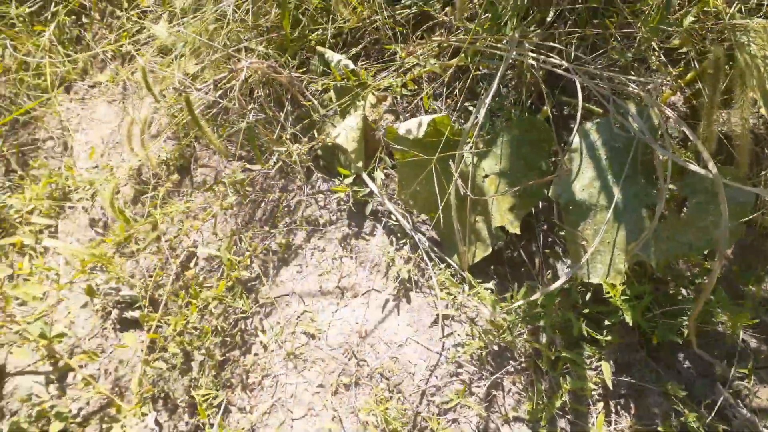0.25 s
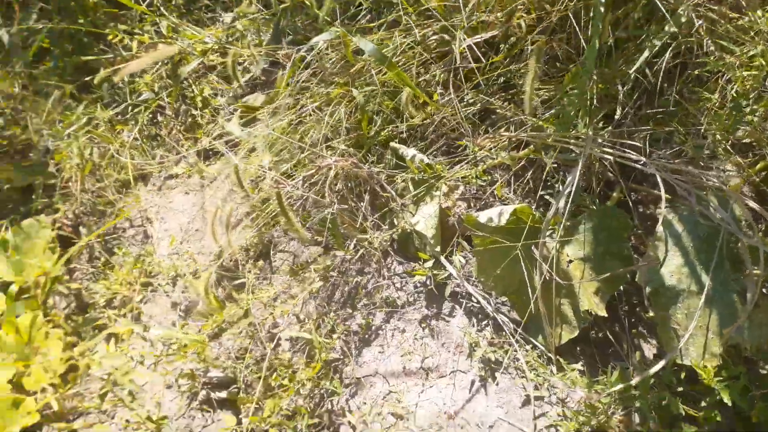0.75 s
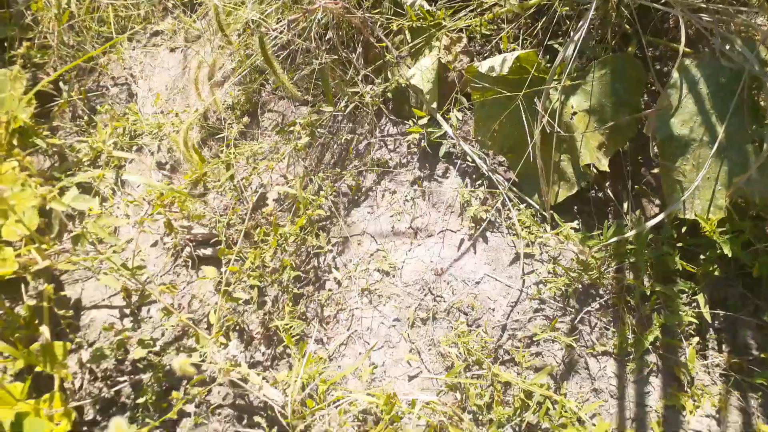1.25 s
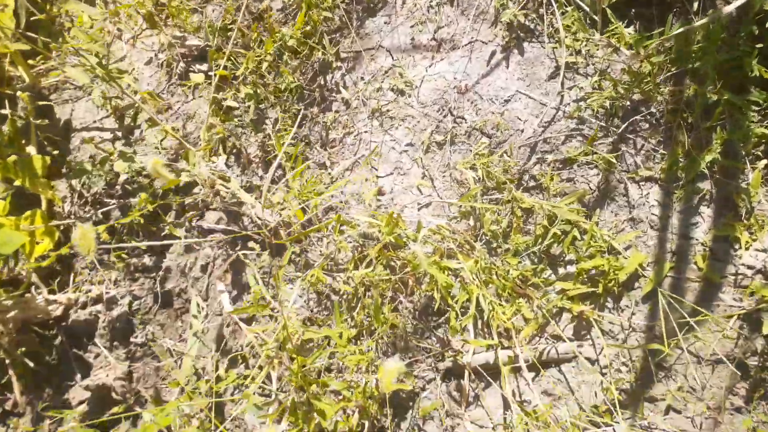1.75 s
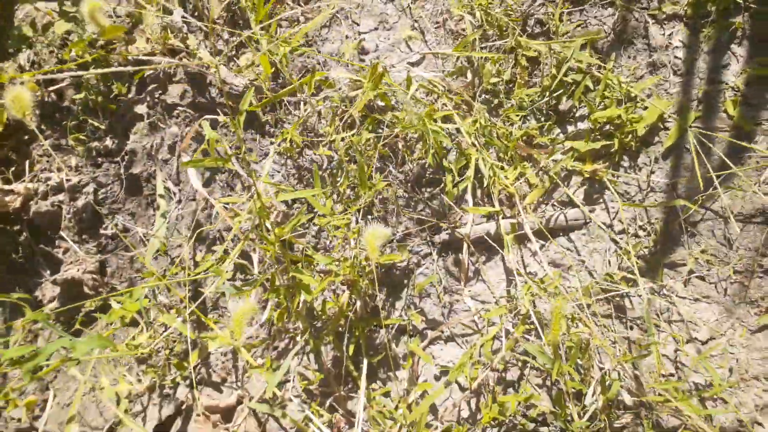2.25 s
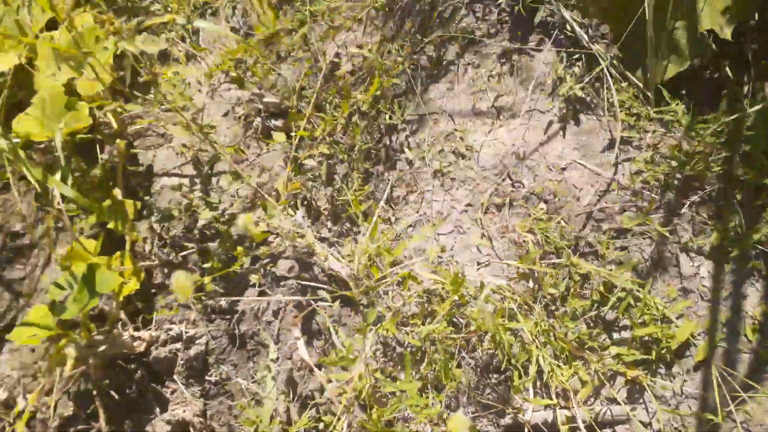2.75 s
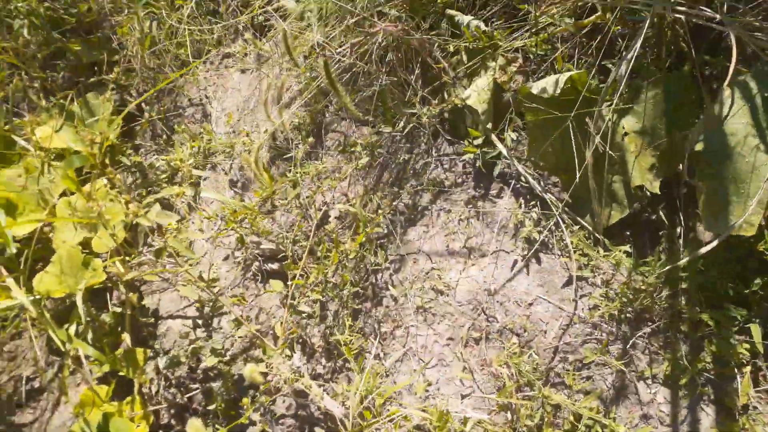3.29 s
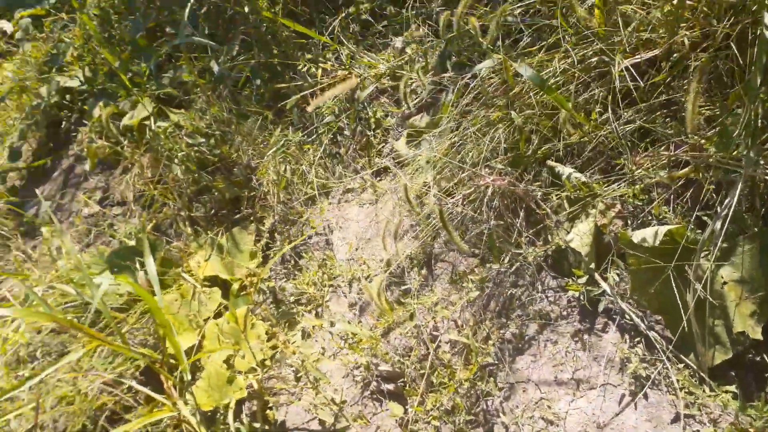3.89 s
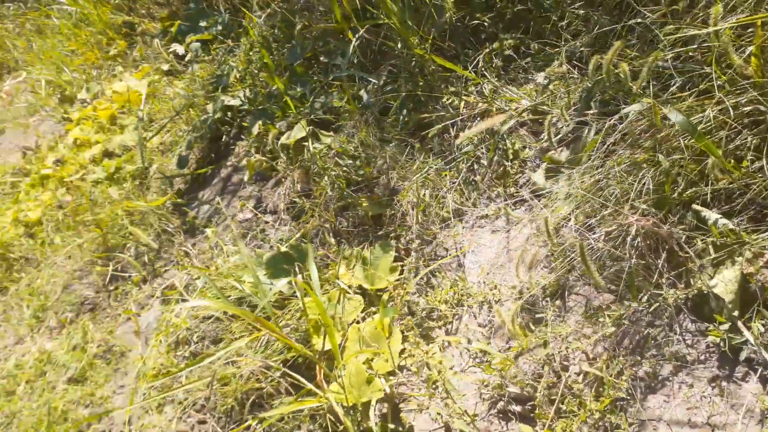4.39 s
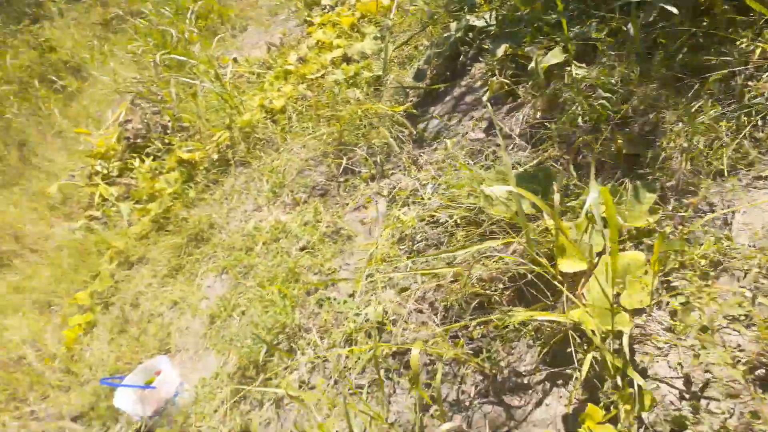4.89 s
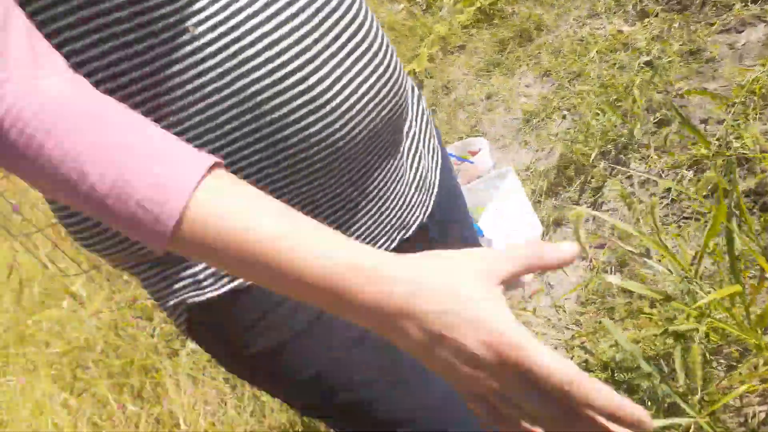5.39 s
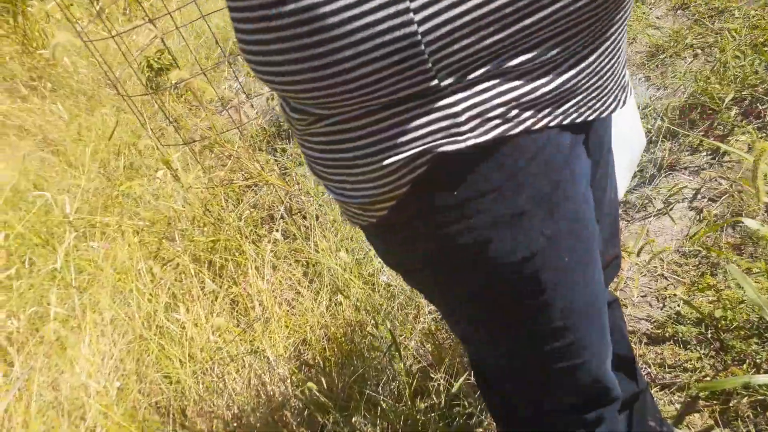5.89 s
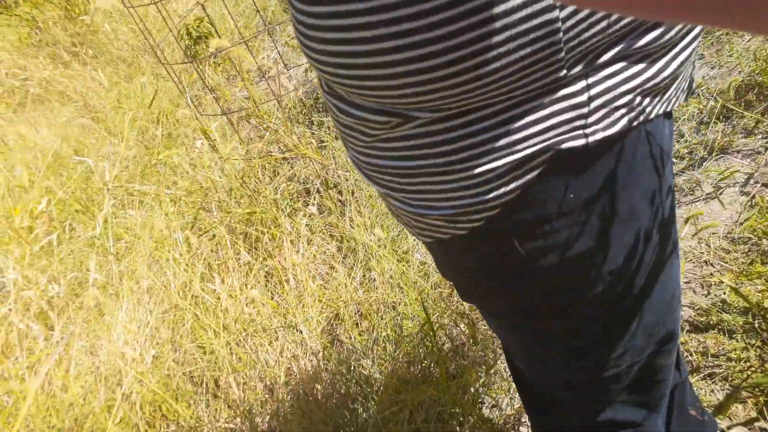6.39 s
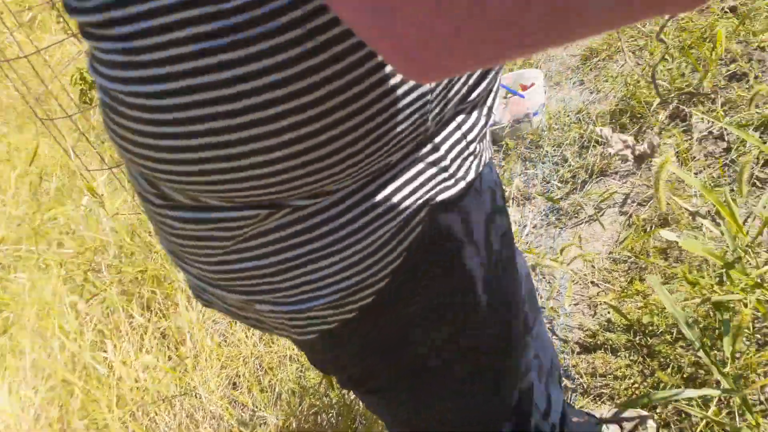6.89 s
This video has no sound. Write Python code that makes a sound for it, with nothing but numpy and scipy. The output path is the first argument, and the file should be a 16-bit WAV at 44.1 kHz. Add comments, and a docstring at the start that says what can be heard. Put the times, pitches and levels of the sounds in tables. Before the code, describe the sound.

Dry weeds rustle and snap close by with dull soil thuds, while crickets trill, a katydid buzzes twice and one distant bang rolls away.

```python
"""Dry leaves rustle close by as weeds are pulled, then brushed past; stems snap and soil thuds.
Rustle is patchy noise with fibre clicks, snaps are noise cracks with ringing tones, thuds are dull noise.
Crickets trill in arched tones, a katydid buzzes twice in pulsed noise, and one distant bang rolls away.
Behind it lie a far engine's wavering tone and noises for rumble, trees and hiss in a summer garden.
Two closely spaced microphones are held above the plants, which lie a little to the right."""
import sys
import numpy as np
from scipy import signal
from scipy.fft import rfft, irfft, next_fast_len
from scipy.io import wavfile
from scipy.ndimage import uniform_filter1d, map_coordinates

SR = 44100
rng = np.random.default_rng(int(sys.argv[2]) if len(sys.argv) > 2 else 0)


def bounce(signal):
    """Save signal as a 16-bit WAV file at the path given by the first command-line argument."""
    frames = np.transpose(np.atleast_2d(signal))
    limited = np.clip(frames, -1, 1)
    pcm = np.round(limited * 32767).astype(np.int16)
    wavfile.write(sys.argv[1], SR, pcm)


N = 315292  # samples

# left-right likeness of the near plants: hz, likeness (1 = identical)
PLANTS_ALIKE = [(200, 0.98), (1000, 0.86), (3000, 0.23), (8000, 0.037), (15000, 0.078)]
# left-right likeness of the open field: hz, likeness (1 = identical)
FIELD_ALIKE = [(80, 0.92), (400, 0.74), (1000, 0.079), (2500, 0.014)]
PORT_LAG = 0.000383  # s by which the plants reach the left microphone later than the right
TOP_HZ = 15900  # upper band limit of the recorder


def amp(db):
    """Decibels to amplitude."""
    return 10 ** (np.asarray(db) / 20)


def unit(x):
    """Scale to rms 1."""
    return x / np.sqrt(np.mean(x ** 2) + 1e-20)


def along(points, hz):
    """Read (hz, value) points on a log frequency axis."""
    f, v = np.transpose(points)
    return np.interp(np.log(hz + 1), np.log(f + 1), v)


def curves(rows):
    """One value per sample for each column after the time."""
    s, *cols = np.transpose(rows)
    return [np.interp(np.arange(N) / SR, s, c) for c in cols]


def wobble(rate):
    """A smooth random curve, rate knots a second."""
    knots = rng.standard_normal(int(N * rate / SR) + 4)
    return map_coordinates(knots, [np.arange(N) * rate / SR])


def white():
    """Two unrelated noises."""
    return rng.standard_normal((2, N))


def filtered(x, response):
    """Multiply the spectrum of x by a complex response of frequency."""
    m = next_fast_len(N + SR // 4)
    return irfft(rfft(x, m) * response(np.fft.rfftfreq(m, 1 / SR)), m)[..., :N]


def placed(pair, spectrum, alike, lag=0):
    """Two unrelated signals become a coloured stereo sound of rms 1, the left side late by lag."""
    def ear(hz, sign):
        # mixing angle that gives the two sides the wanted likeness
        turn = np.arccos(np.clip(along(alike, hz), -1, 1)) / 2
        delay = np.exp(-1j * np.pi * hz * lag * sign)
        return amp(along(spectrum, hz)) * delay * [np.cos(turn), sign * np.sin(turn)]

    sides = [filtered(pair, lambda hz: ear(hz, sign)).sum(0) for sign in (1, -1)]
    return unit(np.array(sides))


def beside(x, lag):
    """A point to the right, heard at both microphones, the left one late by lag."""
    return filtered(x, lambda hz: np.exp(-1j * np.pi * hz * lag * np.array([[1], [-1]])))


def fade(start, t60):
    """A sudden start that dies by 60 dB in t60 seconds."""
    t = np.arange(N) / SR - start
    return (t >= 0) * amp(-60 * np.clip(t / max(t60, .002), 0, 3))


def swell(start, length, attack, release):
    """Rises over the attack, holds to the end of its length, then dies away."""
    t = np.arange(N) / SR - start
    return np.clip(t / attack, 0, 1) * np.exp(-np.clip((t - length) / release, 0, 20))


def fuzzy(hz, width_hz):
    """Narrow noise of rms 1 around a steady or moving pitch."""
    phase = 2 * np.pi * np.cumsum(hz * np.ones(N)) / SR
    return unit(wobble(width_hz) * np.sin(phase) + wobble(width_hz) * np.cos(phase))


def field():
    """Far rumble, an engine's wavering hum, wind in the trees and a fine hiss."""
    # rumble colour: hz, level_db (per Hz)
    rumble_colour = [(20, -44), (32, -21), (45, -9), (65, 0), (90, -2), (130, -11.5), (250, -32)]
    # rumble strength: time_s, level_db
    rumble_level = [(0, -58), (4.5, -58), (6.2, -60.5), (7.15, -56.5)]
    # left-right likeness of the rumble: hz, likeness (1 = identical)
    rumble_alike = [(30, 1), (90, 0.77)]
    # gusts in far trees: centre_s, level_db, half_length_s
    gust_times = [(1.452, -56.5, 0.15), (3.2, -56.5, 0.64), (5.15, -64, 0.27), (6.287, -62, 0.26)]
    # colour of wind in the trees: hz, level_db (per Hz)
    tree_colour = [(71, -36), (120, -9), (156, -1), (183, -3.5), (324, -9), (427, 2.5), (665, -13.5),
                   (821, -7.5), (875, -19.5), (1500, -32), (1950, -44), (3300, -120)]
    # far engine: time_s, level_db
    engine_level = [(0, -64), (3.8, -60), (5.2, -61), (5.5, -53.5), (6.4, -54), (6.9, -59), (7.15, -74)]
    # colour of the fine hiss: hz, level_db (per Hz)
    hiss_colour = [(530, -11), (900, -7), (2830, -19.5), (3380, -13.5), (5280, -18.5), (8250, -5.5),
                   (9530, -15), (12300, -4.5), (16000, -8)]
    breeze_db = -61  # between the gusts

    t = np.arange(N) / SR
    rumble_db = curves(rumble_level)[0] + 0.68 * wobble(6.6)
    rumble = amp(rumble_db) * placed(white(), rumble_colour, rumble_alike)
    gusts = sum(amp(db) * np.exp(-((t - s) / half) ** 2) for s, db, half in gust_times)
    wind = np.hypot(amp(breeze_db), gusts) * amp(1.1 * wobble(8.4))
    trees = wind * placed(white(), tree_colour, FIELD_ALIKE)
    engine_hz = 86 + 1.245 * wobble(5)
    engine = unit(np.sin(2 * np.pi * np.cumsum(engine_hz) / SR))
    hum = amp(curves(engine_level)[0] + wobble(8.5)) * engine
    hiss = amp(-50.5) * placed(white(), hiss_colour, FIELD_ALIKE)
    return rumble + trees + hum + hiss


def chirps(strokes, top_hz, sag_hz, width):
    """One tone per wing stroke: the scraper speeds up and slows, so pitch and level make an arch."""
    u = (strokes + .5) % 1 - .5  # place within the stroke, 0 in its middle
    hz = top_hz - sag_hz * (2 * u) ** 2 + 30 * wobble(300) + 15 * wobble(21)
    force = np.exp(-(u / width) ** 2) * amp(1.3 * wobble(25))
    return unit(force * np.sin(2 * np.pi * np.cumsum(hz) / SR))


def insects():
    """A near cricket swells in bouts over its quiet trill; a second one and a chorus sing further off."""
    # bouts of the near cricket: start_s, length_s, level_db
    bout_times = [(1.05, 1.1, -52), (2.4, .95, -50.5), (4.0, 1.1, -62), (5.9, .97, -52.5)]
    # wing beat of the near cricket: time_s, strokes_per_s
    stroke_rate = [(1.2, 25.2), (2.6, 25), (3.9, 24.81), (5.6, 24.92)]
    # colour of the far crickets: hz, level_db (per Hz)
    chorus_colour = [(6300, -36), (7200, 5), (8100, -4), (8600, 6.5), (9300, -31), (11000, -42)]
    # strength of the far crickets: time_s, level_db
    chorus_level = [(0, -63), (4.5, -60.5), (5.4, -55), (6.5, -51.5), (7.15, -55)]
    quiet_db, attack_s, release_s = -65, .4, .08

    t = np.arange(N) / SR
    strokes = np.cumsum(curves(stroke_rate)[0]) / SR - .57
    trill = chirps(strokes, top_hz=7480, sag_hz=1050, width=.26)
    bouts = sum(amp(db) * swell(s, length, attack_s, release_s) for s, length, db in bout_times)
    near = np.hypot(amp(quiet_db), bouts) * trill * amp([[1.5], [-1.5]])  # a little to the left
    second = amp(-9) * chirps(23.5 * t + .2 * wobble(2), top_hz=8100, sag_hz=800, width=.22)
    chorus = amp(3.2 * wobble(50)) * placed(white(), chorus_colour, FIELD_ALIKE)
    return near + amp(curves(chorus_level)[0]) * (chorus + second)


def katydid():
    """A pulsing buzz: a wing resonance sinks steadily through each call over a broad steady rasp."""
    # calls: start_s, length_s, level_db, starting_pitch_hz
    call_times = [(1.185, 0.68, -48, 13500), (3.747, 0.685, -47, 12580)]
    # colour of the wing rasp: hz, level_db (per Hz)
    wing_colour = [(6000, -28), (8500, -5), (10500, -4), (12200, 0), (13400, -3), (14400, -1.5),
                   (16000, -6)]
    attack_s, release_s, sag_hz_per_s = 0.14, .025, 1000

    t = np.arange(N) / SR
    beat_turns = 50 * t + .15 * wobble(5)  # about 50 pulses a second
    beats = unit(amp(4.3 * np.cos(2 * np.pi * beat_turns)))
    rasp = placed(white(), wing_colour, [(12000, .3)], PORT_LAG)
    calls = 0
    for s, length, db, hz in call_times:
        tone = beside(fuzzy(hz - sag_hz_per_s * (t - s), width_hz=1150), lag=.00041)
        loudness = amp(db) * swell(s, length, attack_s, release_s)
        calls = calls + loudness * (.92 * tone + 1.15 * rasp)
    return beats * calls


def bang():
    """A distant bang: a short blast, a breathy falling whistle and echoes that roll over the fields."""
    # the bang: start_s, level_db
    bang_time = [(4.616, -33)]
    # colour of the blast: hz, level_db (per Hz)
    blast_colour = [(47, -38), (80, -2), (285, -14), (411, 5), (523, -14), (755, -6), (875, -25),
                    (1830, -33), (1970, -41), (3880, -38), (6500, -25), (8450, -57), (14300, -120)]
    scatter_colour = [(30, -10), (70, 21), (150, -8), (750, 5.5), (1600, -2), (3100, -10.0),
                      (4800, -1.5), (7000, -27), (12000, -35)]  # hz, level_db (per Hz)
    roll_colour = [(250, -29), (450, -6), (850, 1.5), (1200, -11), (1800, -16.5)]  # hz, level_db (per Hz)

    s, db = bang_time[0]
    t = np.maximum(np.arange(N) / SR - s, 0)

    def echo(delay, spread):
        return (t > 0) * np.exp(-((t - delay) / spread) ** 2)

    blast_shape = fade(s, .09) + 0.57 * echo(0.024, 0.0084) + 0.27 * fade(s, 0.92)
    blast = blast_shape * placed(white(), blast_colour, [(500, 1.0), (4000, 0.47)])
    scatter = echo(0.074, 0.16) * placed(white(), scatter_colour, [(500, 0.53), (4000, 0.45)])
    roll = echo(.41, 0.22) * placed(white(), roll_colour, FIELD_ALIKE)
    whistle_hz = 3670 + 430 * np.exp(-t / .06)
    whistle = amp(-26) * fade(s, 1.1) * fuzzy(whistle_hz, width_hz=230)
    return amp(db) * (amp(-9.0) * blast + amp(-17.5) * scatter + amp(-21.5) * roll + whistle)


def thuds():
    """Roots let go and clods drop on soft soil: dull noise that dies at once or lingers."""
    # knocks on the soil: start_s, level_db, t60_s
    knocks = [(0.33, -37.5, 0.092), (2.484, -31, 0.1), (2.501, -22, 0.045), (2.51, -36.5, 0.6),
              (2.62, -42, 0.059), (2.641, -32.5, 0.07), (2.8135, -23.5, 0.03), (4.292, -38, 0.062)]
    # colour of the soil: hz, level_db (per Hz)
    soil_colour = [(40, -20), (70, 2.5), (130, -2.5), (320, 6), (520, 0), (720, 4), (920, -37), (2000, -27),
                   (4000, -70)]
    blows = sum(amp(db) * fade(s, t60) for s, db, t60 in knocks)
    return amp(-6.5) * blows * placed(white(), soil_colour, [(300, 0.93)], PORT_LAG)


def creaks():
    """A stalk rubbed on another sings roughly around its own pitch."""
    # rubs: centre_s, level_db, pitch_hz, half_length_s
    rub_times = [(0.527, -41, 5350, 0.08), (1.575, -51.5, 516, 0.05), (1.91, -46, 1050, 0.0082),
                 (1.992, -48, 985, 0.013), (2.641, -33, 1061, 0.0057), (2.962, -47, 3000, 0.014),
                 (3.242, -46, 2800, 0.022), (5.605, -47, 1550, 0.015), (6.042, -47, 2005, 0.034),
                 (7.016, -49, 2154, 0.026)]
    t = np.arange(N) / SR
    rubs = 0
    for s, db, hz, half in rub_times:
        shape = np.exp(-((t - s) / half) ** 2)
        rubs = rubs + amp(db) * shape * fuzzy(hz, width_hz=280 + .14 * hz)
    return beside(rubs, PORT_LAG)


def drag_db():
    """Level of the steady rustle, one value per sample: how hard the plants are dragged."""
    # plants being pulled: time_s, level_db
    pulling = [(0, -36), (0.32, -37.5), (0.47, -29), (0.62, -29.5), (0.79, -33), (0.83, -40), (1.12, -48.5),
               (1.33, -42.5), (2.2, -39.5), (2.58, -29.5), (2.68, -35.5), (3.13, -37), (3.36, -34.5),
               (3.57, -27.5), (3.9, -34), (3.99, -46.5), (4.55, -57.5)]
    # plants then brushed in passing: time_s, level_db
    brushing = [(5.15, -60.5), (5.42, -49.5), (5.85, -59), (6.15, -46), (6.36, -43), (6.6, -50.5),
                (6.83, -41), (6.93, -48), (7.15, -44.5)]
    return curves(np.vstack([pulling, brushing]))[0]


def crackle(per_s, centre_hz, cycles, spread_db):
    """Tiny fibre clicks of rms 1: damped sines of random pitch, a few much louder than the rest."""
    count = int(per_s * N / SR)
    when, pitch, size, life = rng.random((count, 4)).T[:, :, None]
    hz = np.minimum(centre_hz * 4 ** (pitch - .5), TOP_HZ)
    k = np.arange(128)  # samples in one click
    turns = hz * k / SR
    size = amp(-spread_db * np.log(np.maximum(size, np.exp(-5))))
    clicks = size * np.sin(2 * np.pi * turns) * np.exp(-turns / (cycles * (.5 + life)))
    places = (when * N).astype(int) + k
    return unit(np.bincount(places.ravel(), clicks.ravel(), N)[:N])


def patchy(pair, depth_db):
    """Each leaf rings at its own pitches for a moment: random patches of time and frequency stand out."""
    z = signal.stft(pair, nperseg=256)[2]
    patches = rng.standard_normal(z.shape[1:])
    patches = uniform_filter1d(patches, size=4, axis=0)  # across frequency
    patches = uniform_filter1d(patches, size=8, axis=1)  # across time
    return signal.istft(z * amp(depth_db * unit(patches)), nperseg=256)[1][:, :N]


def split(x, edge_hz):
    """The parts of x below and above a frequency, each of rms 1."""
    def low(hz):
        return 1 / (1 + (hz / edge_hz) ** 12)

    return unit(filtered(x, low)), unit(filtered(x, lambda hz: 1 - low(hz)))


def leaf_texture(grain_db):
    """Sliding leaves hiss under fibre clicks; returns the stalk band and the crisp band."""
    # colour of the foliage: hz, level_db (per Hz)
    foliage_colour = [(100, -21.5), (230, -11), (420, -7.5), (680, -14.5), (1000, -4), (1500, -9.5),
                      (2700, -5.5), (3700, -5), (5300, -4.5), (7000, -7.5), (8700, 0), (9600, -2.5),
                      (13000, 1), (16000, -4)]
    clicks = []
    for _ in range(2):
        fine = crackle(per_s=2200, centre_hz=10600, cycles=0.56, spread_db=3.0)
        middle = crackle(per_s=600, centre_hz=2790, cycles=2.1, spread_db=1.5)
        coarse = crackle(per_s=120, centre_hz=745, cycles=0.55, spread_db=2)
        clicks.append(fine + .5 * middle + 0.23 * coarse)
    leaves = patchy(white() + amp(grain_db) * np.array(clicks), depth_db=2.0)
    return split(placed(leaves, foliage_colour, PLANTS_ALIKE, PORT_LAG), edge_hz=7780)


def twigs():
    """Thin twigs break at random, above the rustle of the moment; rows like those of the stems."""
    per_s, spread_db = 8, 3
    when, size, wood, pitch = rng.random((int(per_s * N / SR), 4)).T
    level_db = drag_db()[(when * N).astype(int)] + spread_db * (2 * size - 1)
    crack_db = level_db + 9
    woody_db = level_db - 5.5 + spread_db * (2 * wood - 1)
    pitch_hz = 3600 * 2 ** (pitch - .5)
    return np.column_stack([when * N / SR, crack_db, woody_db, pitch_hz])


def snaps():
    """A stem gives with one sharp crack and rings briefly while its fibres tear."""
    # stems breaking: start_s, crack_db, woody_db, stem_pitch_hz
    stems = [(0.0927, -19, -27, 3350), (0.1455, -17.5, -31, 3160), (0.3292, -18, -35, 3040),
             (0.4199, -12.5, -35, 5800), (0.6364, -18, -30, 4190), (0.6998, -18, -36, 4630),
             (0.7966, -16, -29, 1900), (1.2535, -22, -49, 4650), (1.9669, -23, -38, 4150),
             (2.598, -19, -32, 4470), (2.6205, -11, -24.5, 2650), (2.8124, -25, -35, 2720),
             (2.8384, -26, -39, 2460), (3.1642, -21, -36, 5280), (3.9589, -26, -46, 4680),
             (5.2505, -27.5, -60, 2860), (5.5962, -29, -54, 1560), (5.7329, -31, -52, 4550),
             (5.8925, -29, -53, 5970), (5.9848, -23.5, -41, 5970), (6.0157, -20, -37, 4660),
             (6.1489, -23, -46, 5290), (6.4562, -33, -40, 3560), (6.5324, -33, -43, 4580),
             (7.0359, -23, -48, 2170)]
    sharp_colour = [(800, -22), (2500, -9), (7000, -6), (12000, 0)]  # hz, level_db (per Hz)

    t = np.arange(N) / SR
    crack, dry_tear, woody_tear, ring = np.zeros((4, N))
    for s, db, woody_db, hz in np.vstack([stems, twigs()]):
        tear = fade(s, 0.045)
        crack += amp(db) * fade(s, .0055)
        dry_tear += amp(db) * tear
        woody_tear += amp(woody_db) * tear
        ring += amp(woody_db + 3) * fade(s, .017) * np.sin(2 * np.pi * hz * (t - s))
    stalks, crisp = leaf_texture(grain_db=-12.0)
    sharp = amp(-1.5) * placed(white(), sharp_colour, PLANTS_ALIKE, PORT_LAG)
    fibres = amp(-10.0) * dry_tear * crisp + amp(-6) * woody_tear * stalks
    return crack * sharp + fibres + beside(ring, PORT_LAG)


def slips(per_s, life):
    """Leaves catch and let go: sudden rises at random moments, each dying away; rms 1."""
    kicks = (rng.random(N) < per_s / SR) * (0.15 + rng.random(N))
    return unit(signal.lfilter([1], [1, -np.exp(-1 / (life * SR))], kicks))


def rustle():
    """Dragged plants rustle in quick clumps; single tufts swish past on top."""
    # a tuft of leaves sweeps past: start_s, leaf_tips_db, length_s, stalks_db
    tufts = [(0.147, -31, 0.084, -38), (0.322, -42, 0.019, -37), (0.43, -28.5, .02, -40),
             (0.596, -28.5, 0.041, -34), (0.698, -30, 0.029, -38), (0.857, -35.5, 0.038, -42),
             (0.996, -41, 0.013, -60), (1.64, -34.5, 0.018, -46.5), (1.759, -38, 0.026, -52),
             (1.96, -38, 0.065, -45), (2.13, -41, .035, -42), (2.243, -33.5, 0.066, -40),
             (2.616, -24, .006, -28), (2.718, -33.5, .02, -37.5), (3.033, -35, 0.011, -40.5),
             (3.867, -33, 0.042, -42), (5.223, -50, .02, -73), (5.29, -44, 0.014, -66),
             (5.358, -43, 0.018, -57), (5.489, -46, 0.013, -54), (6.008, -31.5, 0.056, -40),
             (6.55, -39, 0.013, -48), (6.7, -43.5, 0.011, -49), (6.985, -40.5, 0.073, -49.5)]
    attack_s, release_s = 0.0084, 0.016

    tips_power = amp(drag_db()) ** 2
    stalk_power = tips_power * amp(-7) ** 2  # stalks and leaf bodies under the crisp leaf tips
    for s, tips_db, length, stalk_db in tufts:
        sweep = swell(s, length, attack_s, release_s)
        tips_power = tips_power + (amp(tips_db) * sweep) ** 2
        stalk_power = stalk_power + (amp(stalk_db) * sweep) ** 2
    stalks, crisp = leaf_texture(grain_db=-1.5)
    clumps = unit(2.8 + slips(per_s=150, life=0.0063))
    stalk_rustle = np.sqrt(stalk_power) * amp(1.0 * wobble(45)) * stalks
    tip_rustle = np.sqrt(tips_power) * amp(0.84 * wobble(55)) * crisp
    return clumps * (stalk_rustle + tip_rustle)


def scene():
    """The near plants lie a little to the right, with the field and its insects around them."""
    surroundings = field() + insects() + katydid() + bang()
    plants = thuds() + creaks() + snaps() + rustle()
    return surroundings + plants * amp([[-.6], [.6]])


def record(dry):
    """The recorder keeps nothing above its band limit."""
    return filtered(dry, lambda hz: hz < TOP_HZ)


dry = scene()
out = record(dry)
bounce(out)
```